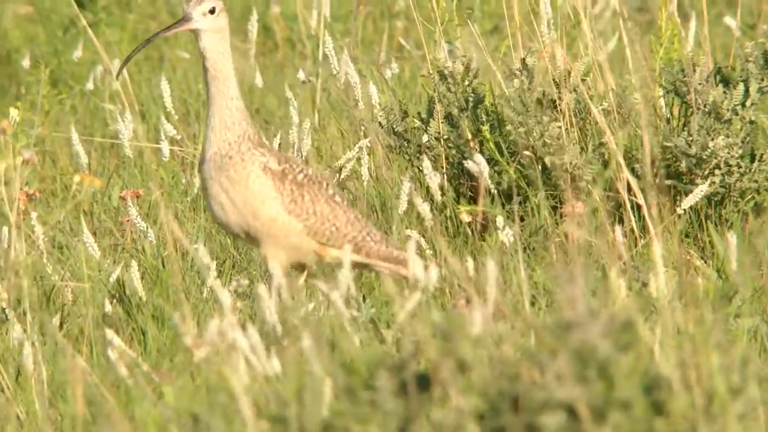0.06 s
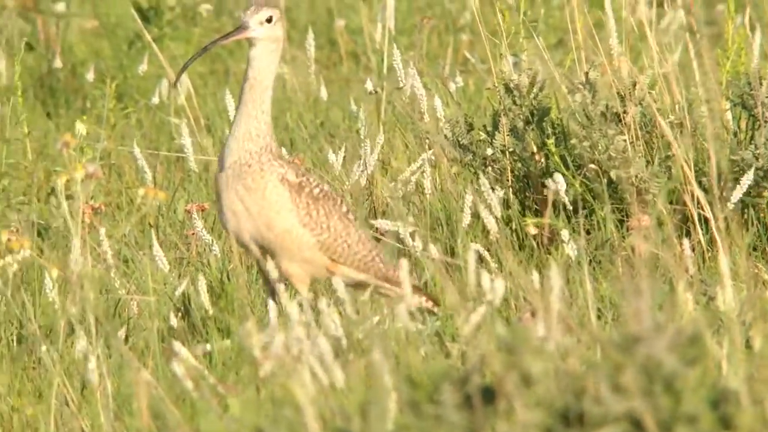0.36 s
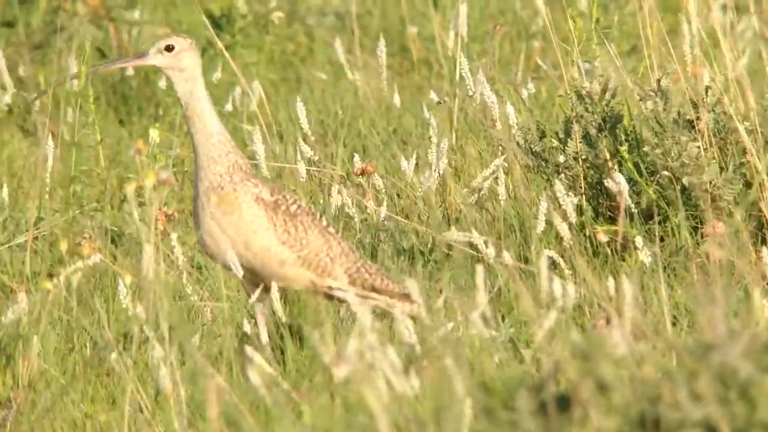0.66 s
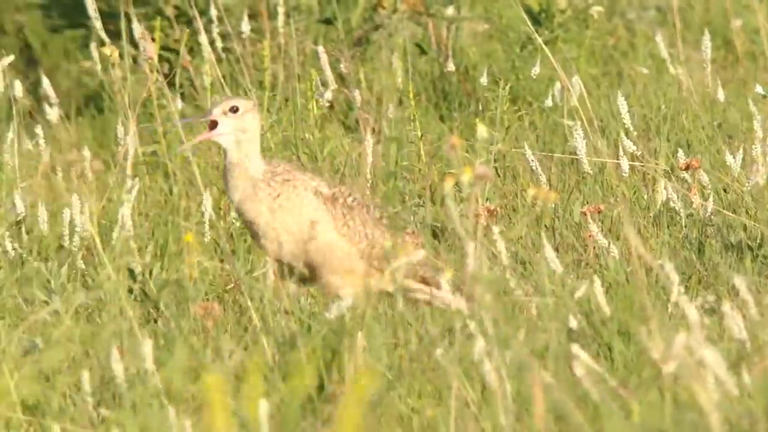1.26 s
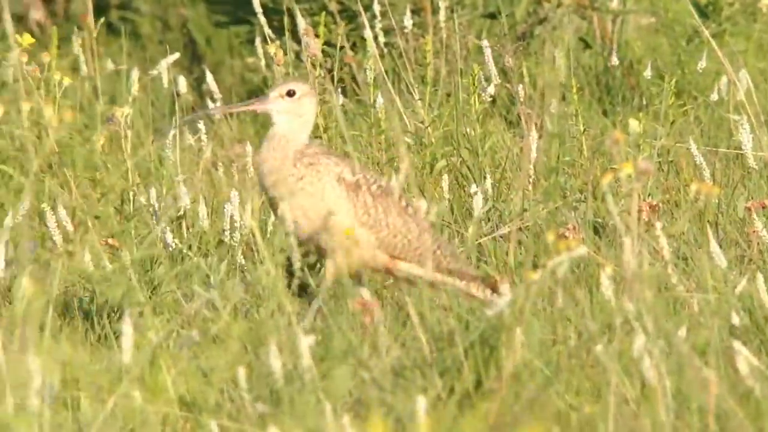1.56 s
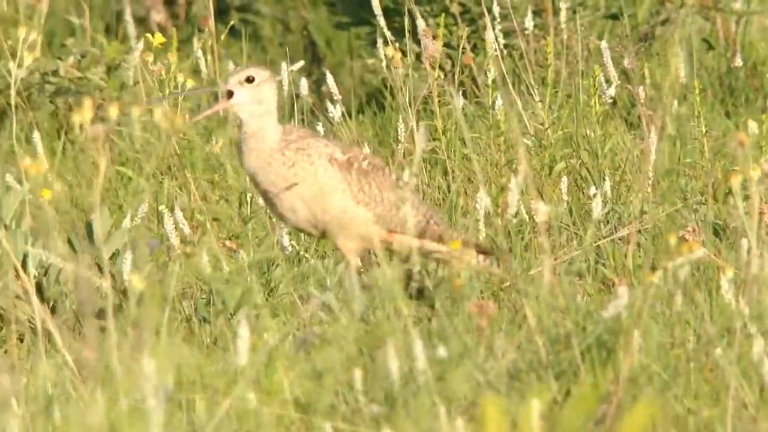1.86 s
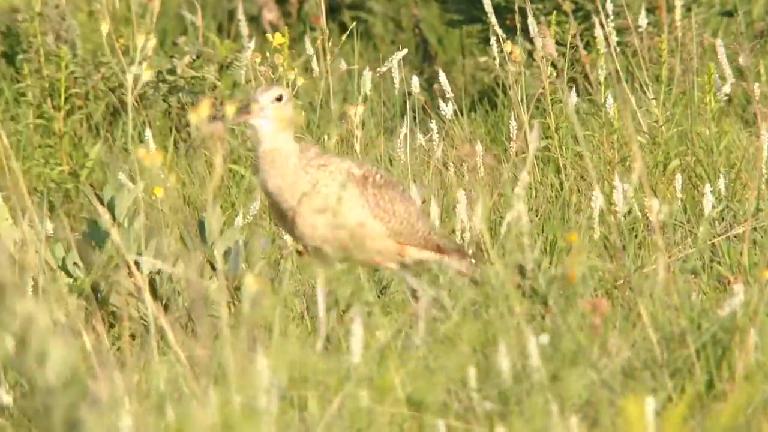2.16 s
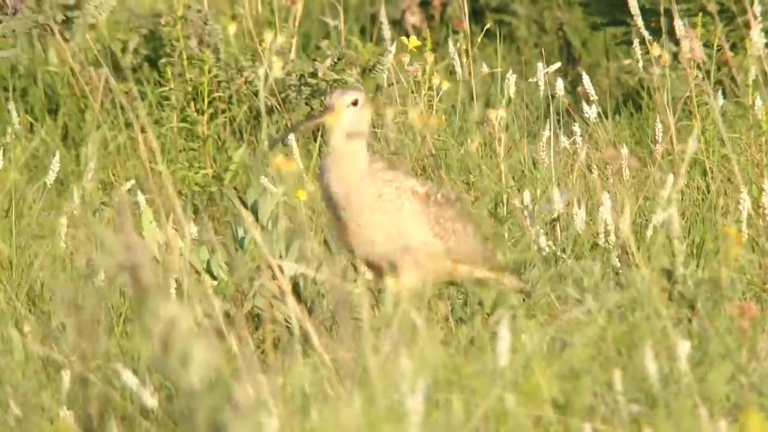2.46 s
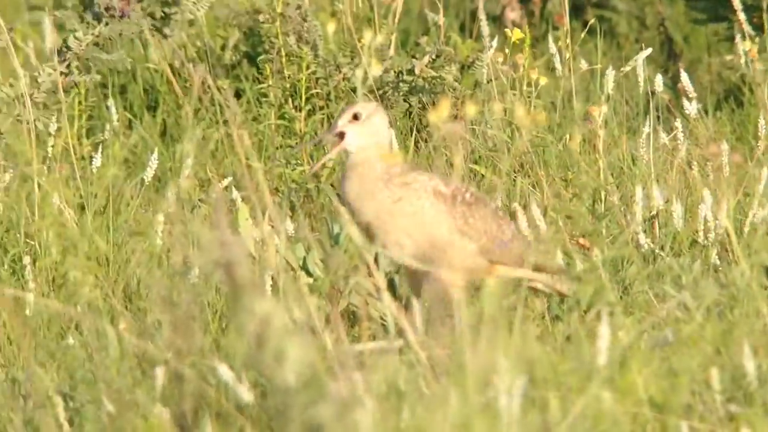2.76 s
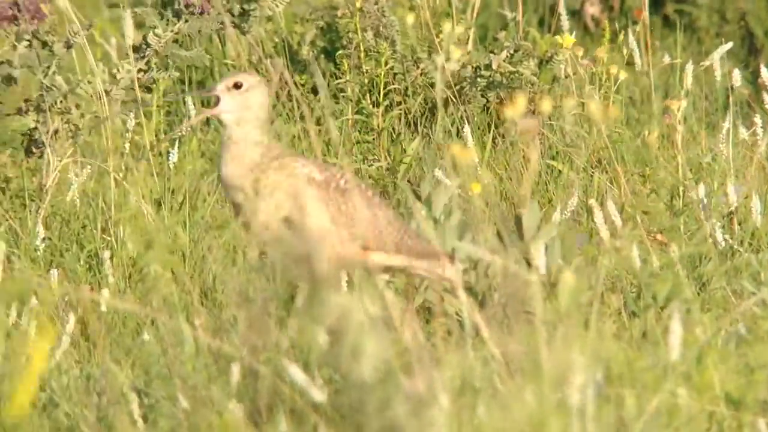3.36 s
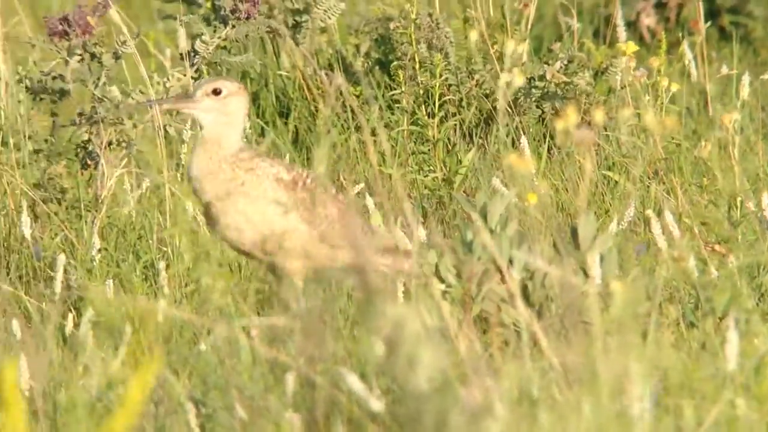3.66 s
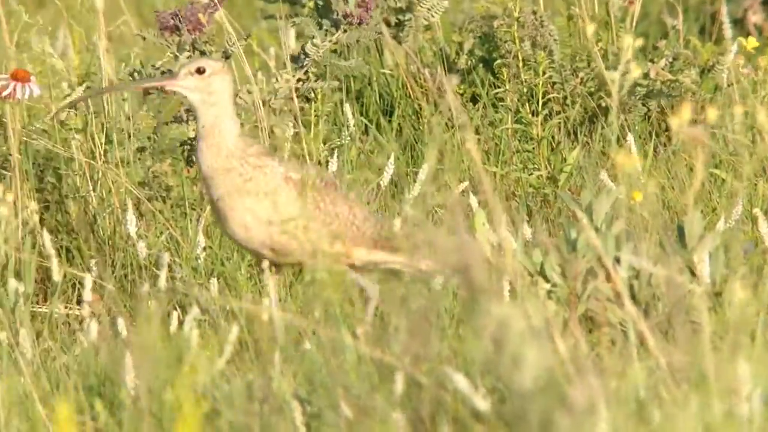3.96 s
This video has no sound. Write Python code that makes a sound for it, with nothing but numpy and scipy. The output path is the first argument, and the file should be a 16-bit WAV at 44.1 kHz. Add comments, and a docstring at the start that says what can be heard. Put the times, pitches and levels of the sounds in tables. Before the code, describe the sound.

A curlew whistles four times in an open meadow, each clear call sliding up and flipping between a lower and higher pitch. Wind rumbles and thumps on the microphone from the start, with very faint insects and distant chirps.

```python
"""A meadow: even hiss, a flickering insect band and faint, high, far-off chirps run throughout.
From the start, wind eddies hit the microphone in short dull thumps over a low rumble.
From 1.2 s a curlew gives four clear whistles, near-pure tones that slide up and flip between a low
and a high register, scattered by grass and shrubs. Its voice catches as the third starts, at 2.7 s.
The rumble swells at the very end."""
import sys
import numpy as np
from scipy import signal
from scipy.fft import rfft, irfft
from scipy.io import wavfile
from scipy.ndimage import uniform_filter1d

SR = 44100
rng = np.random.default_rng(int(sys.argv[2]) if len(sys.argv) > 2 else 0)


def unload_audio(sound):
    """Save the sound as a 16-bit wav file, at the path given as the first command line argument."""
    columns = np.transpose(np.atleast_2d(sound))
    # keep every value between -1 and 1, then stretch to whole-number steps
    steps = np.round(np.clip(columns, -1, 1) * 32767)
    wavfile.write(sys.argv[1], SR, steps.astype(np.int16))


N = 176400
TIME_S = np.arange(N) / SR


def from_db(db):
    """Decibels to gain."""
    return 10 ** (np.asarray(db) / 20)

def unit_rms(x):
    """Scale to rms 1."""
    return x / np.sqrt(np.mean(x ** 2) + 1e-20)

def envelope(rows):
    """Gain per sample from rows of time_s, level_db."""
    return from_db(np.interp(TIME_S, *np.transpose(rows)))

def gain_at(spectrum, hz):
    """Gain from rows of freq_hz, gain_db, interpolated in log frequency."""
    freq_hz, gain_db = np.transpose(spectrum)
    return from_db(np.interp(np.log(hz + 1e-9), np.log(freq_hz), gain_db))

def drift(rate_hz):
    """Smooth random curve, rms 1."""
    hop, settle = 40, 2000
    pole = np.exp(-2 * np.pi * rate_hz * hop / SR)
    noise = rng.standard_normal(N // hop + settle + 2)
    slow = signal.lfilter([1], [1, -2 * pole, pole * pole], noise)[settle:]
    return np.interp(np.arange(N) / hop, np.arange(len(slow)), unit_rms(slow))

def bandpass(x, low_hz, high_hz):
    """Gentle Butterworth band-pass."""
    return signal.sosfilt(signal.butter(2, [low_hz, high_hz], "band", fs=SR, output="sos"), x + 1e-18)

def lowpass(x, top_hz, order):
    """Butterworth low-pass."""
    return signal.sosfilt(signal.butter(order, top_hz, fs=SR, output="sos"), x)

def coloured(noise, spectrum):
    """Shape noise to a spectrum, rms 1."""
    return unit_rms(irfft(rfft(noise) * gain_at(spectrum, np.fft.rfftfreq(N, 1 / SR)), N))

def add(out, start_s, sound):
    """Mix a sound in at start_s."""
    i = int(start_s * SR)
    lo, hi = max(i, 0), min(i + len(sound), N)
    if hi > lo:
        out[lo:hi] += sound[lo - i:hi - i]

def glide(length_s, from_hz, to_hz):
    """Sliding tone that swells and fades."""
    progress = np.linspace(0, 1, int(length_s * SR))
    pitch_hz = from_hz + (to_hz - from_hz) * progress
    return np.sqrt(2) * np.sin(np.pi * progress) * np.sin(2 * np.pi * np.cumsum(pitch_hz) / SR)

def meadow_scatter(x, wet_db, t60_s=0.12):
    """Grass and shrubs scatter a sound into a short diffuse tail."""
    t = TIME_S[:SR // 2]
    tail = rng.standard_normal(len(t)) * from_db(-60 * t / t60_s)
    return from_db(wet_db) * signal.fftconvolve(x, tail / np.linalg.norm(tail))[:N]


# Still air and hiss spectrum: freq_hz, relative_db
HISS_SPECTRUM = [(25, 24.5), (100, 5.5), (300, 4), (700, -16.5), (1300, 1), (2500, 1), (5000, 2.5),
                 (8000, 0.5), (12000, 0.5), (15500, -1)]

def hiss(level_db=-66.5):
    """Steady noise floor."""
    return from_db(level_db) * coloured(rng.standard_normal(N), HISS_SPECTRUM)


def insects(level_db=-85.5, flicker_db=5):
    """Narrow high noise band with a flickering level."""
    noise = bandpass(rng.standard_normal(N), low_hz=5180, high_hz=5620)
    flicker = from_db(flicker_db * np.tanh(drift(rate_hz=17)))
    return from_db(level_db) * unit_rms(noise * flicker)


def chirps(rows, step_s, stroke_s, from_hz, to_hz):
    """Each chirp: three quick strokes, slightly detuned."""
    out = np.zeros(N)
    for start_s, level_db in rows:
        for k, detune in enumerate(1 + 0.014 * rng.standard_normal(3)):
            stroke = glide(stroke_s, from_hz * detune, to_hz * detune)
            add(out, start_s + k * step_s, from_db(level_db) * stroke)
    return out


# Chirps of two far callers: start_s, level_db
LOWER_CALLER = [(.123, -76), (.495, -77), (.852, -77), (1.635, -76), (1.933, -76), (2.7, -77), (3.065, -76),
                (3.425, -78), (3.773, -77)]
HIGHER_CALLER = [(.115, -77), (.44, -78), (1.06, -78), (2.255, -78), (2.57, -80), (3.27, -80), (3.76, -80)]

def far_callers():
    """Falling chirps, blurred by distance."""
    lower = chirps(LOWER_CALLER, step_s=0.041, stroke_s=0.0275, from_hz=5220, to_hz=4670)
    higher = chirps(HIGHER_CALLER, step_s=0.037, stroke_s=0.024, from_hz=5650, to_hz=5230)
    return lower + higher + meadow_scatter(lower + higher, wet_db=-3)


# Eddies at the microphone: time_s, rumble_db, thump_db, flap_db
EDDIES = [(0.045, -34, -35, -57), (0.074, -48, -43, -61), (0.185, -42, -36, -57), (0.228, -49, -50, -57),
          (0.252, -30, -35, -54), (0.306, -39, -35, -50), (0.333, -40, -36, -56), (0.441, -38, -38, -59),
          (0.475, -41, -39, -59), (0.508, -31, -32, -46), (0.519, -39, -41, -51), (0.585, -37, -41, -53),
          (0.606, -31, -38, -64), (0.626, -38, -45, -62), (0.683, -32, -36, -50), (0.691, -36, -41, -52),
          (0.72, -48, -49, -64), (0.798, -37, -41, -52), (0.907, -43, -44, -63), (0.938, -41, -46, -58),
          (1.0, -34, -48, -67), (1.148, -38, -34, -56), (1.226, -41, -47, -59), (1.506, -37, -36, -64),
          (1.638, -35, -32, -57), (1.702, -41, -36, -62), (1.728, -39, -41, -56), (1.775, -42, -45, -63),
          (1.798, -38, -42, -67), (1.85, -37, -35, -59), (1.879, -34, -31, -46), (1.908, -30, -43, -58),
          (1.917, -37, -44, -55), (1.958, -31, -26, -50), (2.162, -30, -43, -54), (2.179, -35, -27, -39),
          (2.217, -44, -44, -59), (2.25, -38, -39, -66), (2.304, -42, -37, -76), (2.345, -24, -30, -57),
          (2.368, -28, -43, -65), (2.458, -25, -40, -62), (2.496, -33, -46, -69), (2.653, -39, -47, -71),
          (2.794, -35, -47, -77), (2.989, -43, -37, -70), (3.037, -33, -49, -73), (3.133, -44, -48, -75),
          (3.52, -33, -41, -77), (3.562, -25, -38, -66), (3.597, -31, -31, -58), (3.654, -33, -39, -60),
          (3.674, -26, -26, -49), (3.753, -37, -34, -53), (3.799, -23, -39, -52), (3.822, -33, -43, -63),
          (3.871, -29, -34, -64), (3.889, -37, -39, -55)]
# Rumble, thump and flap bands: low_hz, high_hz, spread_s, trim_db
EDDY_BANDS = [(52, 117, 0.013, 1.5), (122.8, 271, 0.0059, -.5), (412, 679, 0.0069, 1.5)]

def buffets(raggedness=0.89, lead_cycles=0.91, energy_window_s=0.013):
    """Each eddy: one pressure kick in a ragged noise burst, heard in three bands."""
    out = np.zeros(N)
    t = np.arange(-SR // 20, SR // 10) / SR
    for time_s, *levels_db in EDDIES:
        kick = rng.choice([-1, 1]) * (t == 0)
        for level_db, (low_hz, high_hz, spread_s, trim_db) in zip(levels_db, EDDY_BANDS):
            burst = rng.standard_normal(len(t)) * np.exp(-np.abs(t) / spread_s)
            pressure = kick + raggedness * burst / np.linalg.norm(burst)
            puff = lowpass(bandpass(pressure, low_hz, high_hz), 1.2 * high_hz, order=3)
            puff *= np.sqrt(energy_window_s * SR) / np.linalg.norm(puff)
            lead_s = lead_cycles / high_hz  # offsets the filter delay
            add(out, time_s + t[0] - lead_s, from_db(level_db + trim_db) * puff)
    return out


# Turbulence spectrum: freq_hz, relative_db
RUMBLE_SPECTRUM = [(20, -13), (30, -40), (42, 0.5), (75, 1.5), (110, 3.5), (170, -7.5), (300, -21.5),
                   (500, -43), (750, -57.5), (1100, -46), (2000, -71)]
# Wind layer envelopes: time_s, level_db
RUMBLE_LEVEL = [(0, -52), (.45, -47.5), (.72, -49.5), (1.0, -45), (1.08, -54), (1.2, -48), (1.36, -45),
                (1.7, -44.5), (2.0, -38.5), (2.2, -39), (2.47, -41.5), (2.58, -52.5), (2.74, -53),
                (2.82, -44.5), (3.03, -40), (3.22, -71), (3.47, -58.5), (3.55, -35), (3.84, -40),
                (3.94, -50), (4.0, -25.5)]
FLUTTER_LEVEL = [(0, -62), (.3, -58), (.62, -59), (.76, -66), (.92, -58), (1.06, -60), (1.2, -55),
                 (1.38, -62), (1.65, -59), (1.9, -57), (2.07, -63), (2.2, -57), (2.48, -62), (2.57, -78),
                 (2.8, -78), (3.0, -70), (3.2, -85), (3.48, -85), (3.62, -62), (3.9, -62), (4.0, -66)]
RUSH_LEVEL = [(0, -78), (2.6, -79.5), (2.95, -71.5), (3.3, -74.5), (3.5, -76.5), (4.0, -81)]

def wind(lump_db=4.5, flutters_per_s=130, flutter_spread_db=1.5, flutter_lump_db=7.5):
    """Lumpy turbulent rumble, small flutters that swell with it, a soft rush and the buffets."""
    lumps = np.tanh(drift(rate_hz=21))
    turbulence = rng.standard_normal(N) * from_db(lump_db * lumps)
    rumble = coloured(turbulence, RUMBLE_SPECTRUM) * envelope(RUMBLE_LEVEL)
    kick_db = flutter_spread_db * np.minimum(rng.exponential(1, N), 3) + flutter_lump_db * lumps
    kicks = (rng.random(N) < flutters_per_s / SR) * rng.choice([-1, 1], N) * from_db(kick_db)
    flutter = unit_rms(bandpass(kicks, low_hz=198, high_hz=418)) * envelope(FLUTTER_LEVEL)
    rush = unit_rms(bandpass(rng.standard_normal(N), low_hz=380, high_hz=880)) * envelope(RUSH_LEVEL)
    return rumble + rush + lowpass(flutter + buffets(), top_hz=1060, order=8)


# Whistle notes, one curve per stay in a register: time_s, pitch_hz, level_db
CURLEW_NOTES = [
    [(1.18, 2240, -78), (1.22, 2441, -71), (1.368, 2502, -72), (1.446, 2550, -70.5), (1.456, 2583, -69)],
    [(1.459, 2900, -64), (1.465, 2950, -66), (1.569, 3123, -57), (1.599, 3050, -58), (1.61, 2900, -70)],
    [(1.9, 1730, -70), (1.91, 1785, -75), (1.916, 1996, -80), (1.94, 2254, -68), (1.958, 2397, -66.5)],
    [(1.961, 2900, -64), (1.973, 2910, -62), (2.013, 2929, -61), (2.061, 2874, -65), (2.067, 2828, -65)],
    [(2.07, 2524, -66), (2.076, 2520, -66.5), (2.128, 2525, -69), (2.192, 2583, -64), (2.209, 2620, -63)],
    [(2.212, 3030, -57.5), (2.234, 3143, -55.5), (2.282, 3194, -56.5), (2.302, 3160, -56),
     (2.312, 2990, -62)],
    [(2.695, 2166, -73), (2.703, 2195, -73), (2.719, 2403, -66), (2.732, 2519, -67)],
    [(2.735, 3000, -66), (2.743, 2961, -65.5), (2.801, 2933, -68), (2.835, 2840, -70), (2.839, 2770, -67)],
    [(2.842, 2507, -70), (2.848, 2493, -71.5), (2.91, 2530, -68), (2.964, 2650, -61), (2.971, 2750, -63)],
    [(2.974, 3186, -58), (2.994, 3188, -57), (3.018, 3137, -56.5), (3.03, 3000, -63)],
    [(3.385, 1706, -81), (3.417, 2248, -75), (3.433, 2445, -67), (3.463, 2583, -67), (3.472, 2582, -69)],
    [(3.475, 3001, -65), (3.491, 2973, -64), (3.607, 2890, -72), (3.743, 3119, -59.5), (3.762, 3040, -65)],
]
# Harmonic response relative to the fundamental: harmonic_hz, gain_db
SECOND_HARMONIC = [(4000, -15), (5100, -39), (5850, -13), (6400, -29)]
THIRD_HARMONIC = [(6000, -14), (7300, -6), (7440, -19), (7650, -14), (7900, -29), (8800, -17),
                  (9300, -19.5), (9600, -31)]
# Extra harmonic gain, one per note: gain_db
NOTE_BRIGHTNESS_DB = [1, -2, -1, -2, -1, -6, -3, 1, -2, -3, -11, -10]
# Low catch in the voice: start_s, length_s, from_hz, to_hz, level_db
VOICE_CATCH = [(2.674, 0.031, 843, 1022, -64.5)]

def curlew(fade_s=0.0015, waver_depth=0.0028, waver_hz=84, shimmer_db=0.34):
    """Near-pure whistle with weak harmonics; breaks abruptly between registers."""
    time_s, note_hz, note_db = np.concatenate(CURLEW_NOTES).T
    pitch_hz = uniform_filter1d(np.interp(TIME_S, time_s, note_hz), size=90)
    pitch_hz *= 1 + waver_depth * drift(waver_hz)
    gate = np.zeros(N)
    for note in CURLEW_NOTES:
        inside_s = np.minimum(TIME_S - note[0][0], note[-1][0] - TIME_S)
        gate += np.clip(inside_s / fade_s + 1, 0, 1)
    level_db = np.interp(TIME_S, time_s, note_db) + shimmer_db * drift(waver_hz)
    amplitude = np.sqrt(2) * np.minimum(gate, 1) * from_db(level_db)
    brightness = envelope([(point[0], db) for note, db in zip(CURLEW_NOTES, NOTE_BRIGHTNESS_DB)
                           for point in note])
    phase = 2 * np.pi * np.cumsum(pitch_hz) / SR
    second = gain_at(SECOND_HARMONIC, 2 * pitch_hz) * np.sin(2 * phase)
    third = gain_at(THIRD_HARMONIC, 3 * pitch_hz) * np.sin(3 * phase)
    out = amplitude * (np.sin(phase) + brightness * (second + third))
    for start_s, length_s, from_hz, to_hz, catch_db in VOICE_CATCH:
        add(out, start_s, from_db(catch_db) * glide(length_s, from_hz, to_hz))
    return out


def scene():
    """Curlew, wind and meadow background at one microphone."""
    bird = curlew()
    return (bird + meadow_scatter(bird, wet_db=-17) + wind() + far_callers() + insects() + hiss())[None]

def record(dry):
    """Short fades at both ends, steep top cut."""
    fade_s, cutoff_hz = 0.004, 15350
    fade = np.clip(np.minimum(TIME_S, TIME_S[-1] - TIME_S) / fade_s, 0, 1)
    return signal.sosfilt(signal.ellip(12, 0.1, 80, cutoff_hz, fs=SR, output="sos"), dry * fade)


dry = scene()
out = record(dry)
unload_audio(out)
```